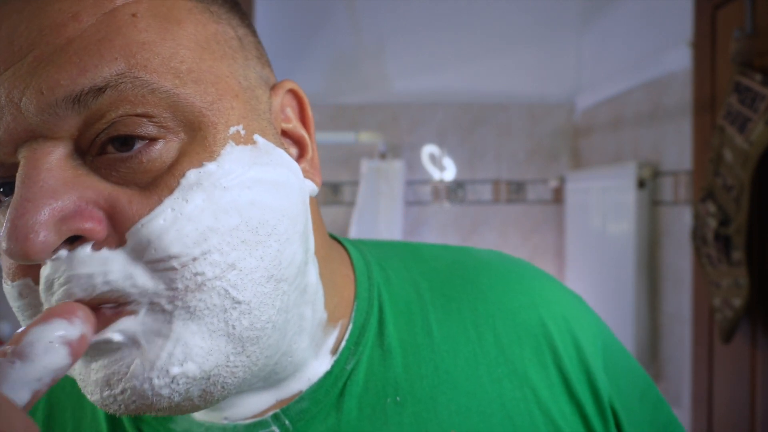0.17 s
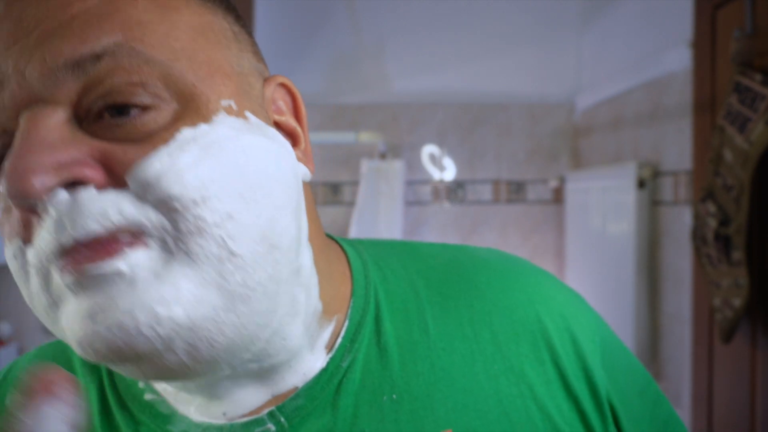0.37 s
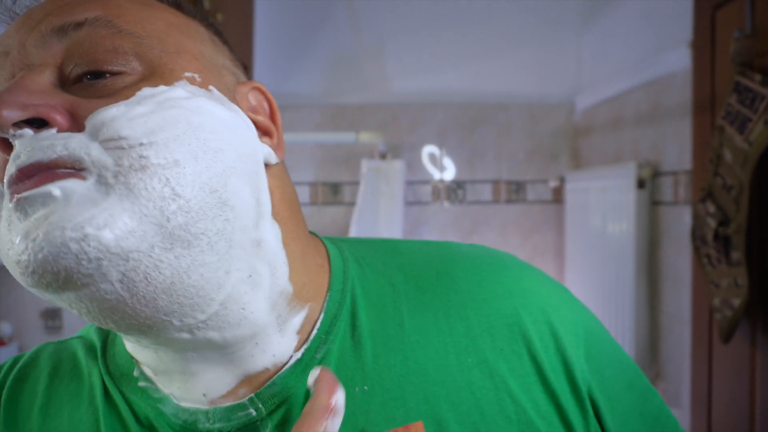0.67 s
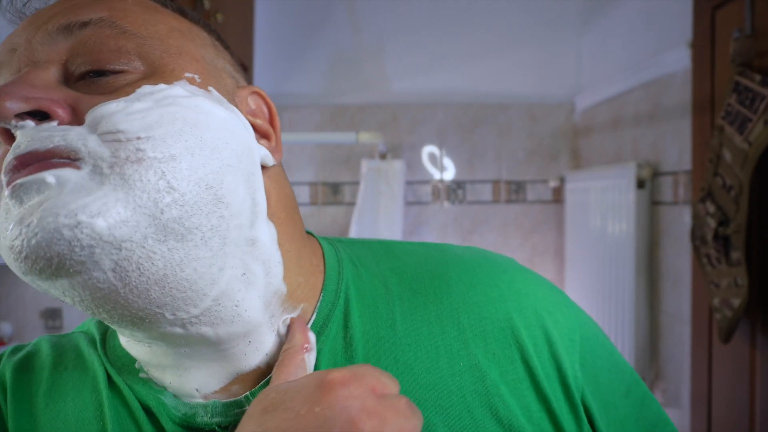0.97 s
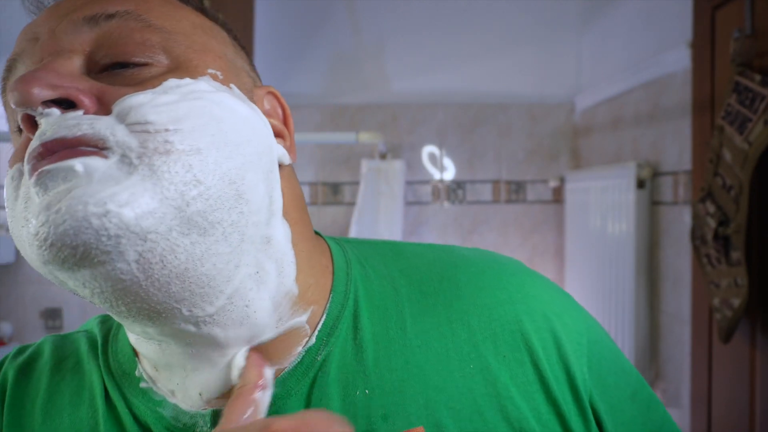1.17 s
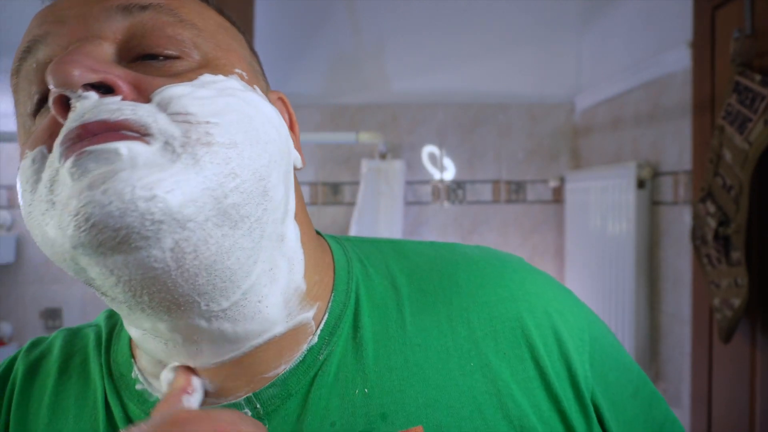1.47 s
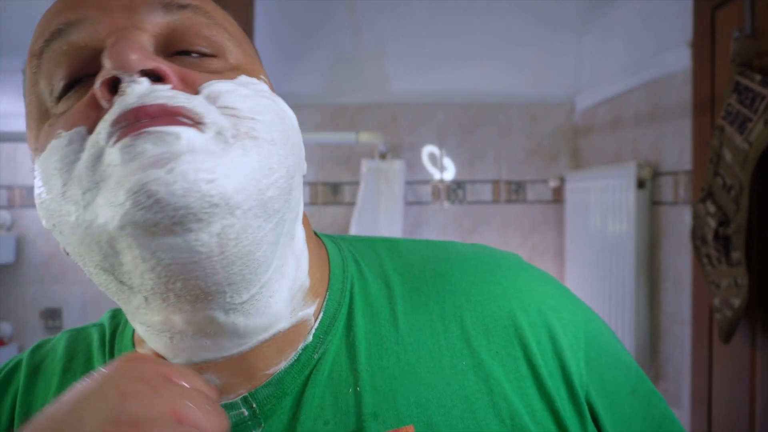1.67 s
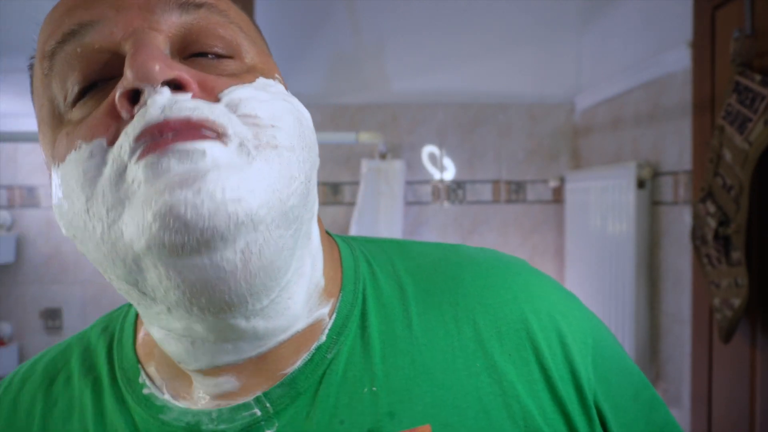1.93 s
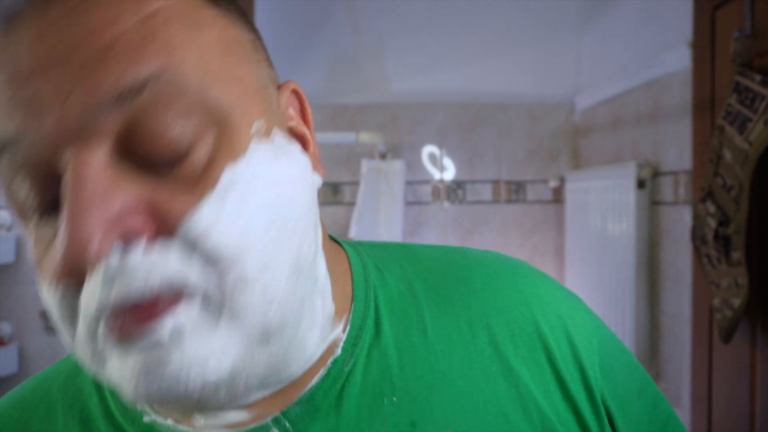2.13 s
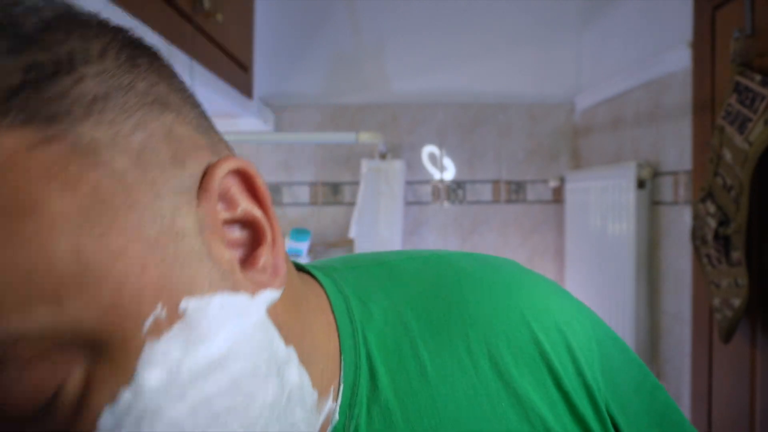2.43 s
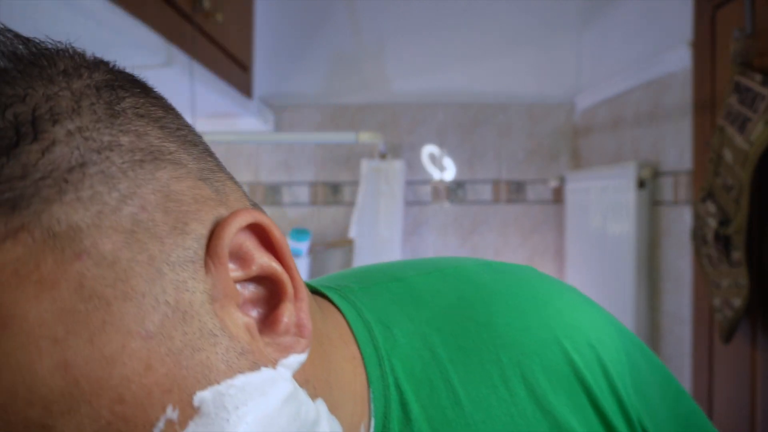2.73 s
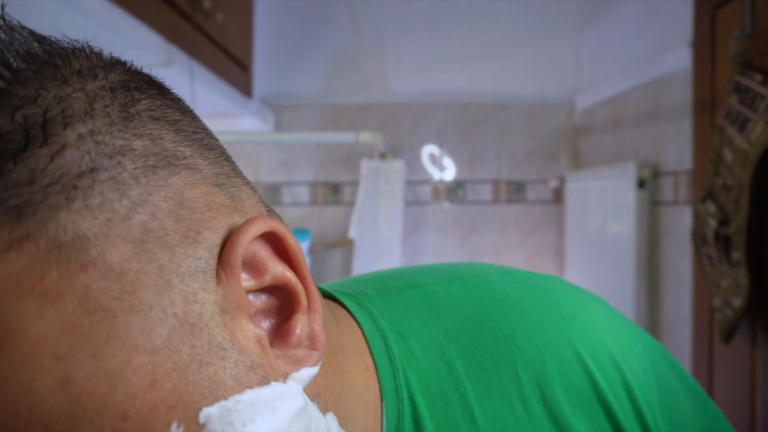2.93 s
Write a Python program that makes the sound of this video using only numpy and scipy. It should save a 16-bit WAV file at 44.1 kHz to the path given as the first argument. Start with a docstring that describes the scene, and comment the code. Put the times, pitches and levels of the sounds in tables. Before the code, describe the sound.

A bright, steady tap stream churns and fizzes in a basin, picked up close in a reverberant bathroom; one soft knock, then drops and sloshes, faint bumps, and finally a slightly thinner hiss.

```python
"""Tap running into a washbasin

A tap runs in a small tiled bathroom: filtered click noise for the hiss, fading sines for fizz and gurgling
bubbles, resonators for churn, bowl and drain. Drops smack the basin, something knocks and bumps softly,
someone shuffles, and near the end a hand enters the stream: the hiss weakens, the bowl's pitch rises.
Dense room reflections surround it all; the stereo is nearly mono in the lows and wide in the treble."""
import sys
import numpy as np
from scipy import signal
from scipy.fft import rfft, irfft
from scipy.io import wavfile
from scipy.ndimage import uniform_filter1d

SR = 44100
rng = np.random.default_rng(int(sys.argv[2]) if len(sys.argv) > 2 else 0)


def master_out(mix):
    """Clip the mix to full scale and print it as 16-bit PCM to the path in sys.argv[1]."""
    frames = np.transpose(np.atleast_2d(mix))
    ceiling = np.clip(frames, -1, 1)
    pcm = np.round(ceiling * 32767).astype(np.int16)
    wavfile.write(sys.argv[1], SR, pcm)


N = 136710

# shuffles of someone moving: (time [s], length [s], level before trim [dB], centre [Hz], width [Hz])
SHUFFLES = [(2.08, .32, -79.5, 255, 100), (2.8, .18, -77, 145, 35), (2.79, .35, -76.5, 300, 60),
            (3.01, .2, -67, 365, 55)]
SHUFFLE_TRIM_DB = 2

# soft bumps: (time [s], peak before onset softening [dB], pitch [Hz])
BUMPS = [(0.125, -61.5, 440), (0.181, -62, 390), (0.401, -62.5, 420), (1.069, -55, 418), (1.246, -60, 400),
         (1.264, -57, 445), (1.414, -57.5, 408), (2.045, -61, 417), (2.654, -56.5, 460), (2.859, -65, 165),
         (3.041, -48, 380), (3.077, -47.5, 378)]
BUMP_T60_S, BUMP_ATTACK_S, BUMP_ROOM_DB = 0.09, 0.002, -1.5

# contacts of the knock: (time [s], peak [dB])
KNOCKS = [(.5145, -40), (.5305, -61)]
# modes of the knocked object: (frequency [Hz], relative level [dB], T60 [s])
KNOCK_MODES = [(500, 5.5, .12), (590, -12, .08), (690, -8, .05), (780, -3, .1), (970, -14, .06),
               (1110, -6, .09), (1225, -9, .06), (1490, -21, .06)]
KNOCK_ROOM_DB = -1.5
RATTLE_DB, RATTLE_HZ, RATTLE_WIDTH_HZ = -17.5, 830, 480  # level re knock peak
RATTLE_T60_S, RATTLES_PER_S = 0.3, 700

BURBLES_PER_S, BURBLE_HZ, BURBLE_OCTAVES, BURBLE_DB = 80, 1200, 0.6, -82
BURBLE_CYCLES, BURBLE_GLIDE = 45, 0.08  # cycles per T60, share of pitch gained over T60

# bowl ringing: (time [s], level [dB])
BOWL_LEVEL = [(0.35, -84), (0.7, -76), (1.0, -81), (1.1, -73), (1.33, -74), (1.48, -86), (2.58, -86),
              (2.67, -66), (2.9, -75)]
BOWL_HZ, BOWL_WIDTH_HZ, BOWL_FLUTTER_DB = 1014, 64, 2
HAND_IN_S, BOWL_HAND_RISE = 2.8, 0.021  # rise as share of pitch

# hollow resonances of basin and drain: (centre [Hz], width [Hz], relative level [dB])
DRAIN = [(275.8, 21, -7), (383, 10.7, -0.5), (441, 43, -6.5), (476, 59, 7.5)]
GURGLE_DB, GURGLE_SWELL_DB = -76, 1.2

FIZZ_PER_S, FIZZ_HZ, FIZZ_OCTAVES = 700, 5620, 0.339  # octaves: rms pitch scatter
FIZZ_CYCLES, FIZZ_DB = 40, -55.5  # cycles per T60

# drops smacking the basin: (time [s], ping peak [dB], pitch [Hz])
DROPS = [(0.3113, -27.5, 6150), (0.326, -37, 5700), (0.347, -38, 5890), (1.195, -35.5, 6000),
         (1.3804, -29.5, 5700), (1.4182, -33.5, 5740), (1.4235, -37, 6030), (1.563, -32.5, 4250),
         (1.576, -33, 3950), (2.245, -34, 6140), (2.375, -35, 4640), (2.669, -34.5, 4500),
         (2.6995, -33.5, 8040)]
DROP_T60_S, DROP_ROOM_DB = 0.007, -0.5
SMACK_DB, SMACK_DECAY_S = -9, 0.0015  # level re ping, 1/e time

# sloshes in basin and over hand: (time [s], length [s], level before trim [dB], centre [Hz], width [Hz])
SLOSHES = [(0.405, .11, -62, 1520, 330), (0.532, .035, -49, 2350, 260), (0.56, .3, -70, 1150, 400),
           (0.58, .4, -56, 2350, 200), (2.617, .085, -48, 2020, 200), (2.645, .05, -62, 1200, 800),
           (2.59, .15, -49, 3900, 1500), (2.68, .55, -57.5, 3030, 450), (2.8, .8, -68, 1520, 220),
           (2.825, .04, -46.5, 2100, 200), (2.832, .04, -48, 4900, 1200), (2.9, .3, -75, 860, 300)]
SLOSH_TRIM_DB = -1.5

# resonances of the churning water: (centre [Hz], width [Hz], relative level [dB])
CHURN_RINGS = [(1936, 60, 2), (2044, 55, 6), (2130, 25, 3), (2341, 65, 3.5), (2680, 80, 0), (3096, 103, 2)]
# churning: (time [s], level [dB])
CHURN_LEVEL = [(0, -59), (0.35, -54.5), (0.7, -54.5), (1.3, -54.5), (1.9, -51), (2.3, -57.5), (2.39, -62),
               (2.48, -54), (2.95, -53), (3.04, -56.5)]
CHURN_FLUTTER_DB, CHURN_LOWEST_HZ = 1.4, 1800

# spray colour: (frequency [Hz], relative level [dB per Hz])
SPRAY_COLOUR = [(25, -50), (62, -36), (115, -34), (150, -27.5), (225, -28), (400, -25), (620, -41),
                (760, -19), (900, -27), (1300, -22.5), (1560, -17), (1770, -15), (1920, -2.5), (2500, -5),
                (2850, -5), (3500, -5.5), (4100, -3.5), (4750, 0), (5250, -4.5), (5900, 2), (7300, -2),
                (8100, 0), (9300, -3), (12000, -3.5), (15500, -5.5)]
# spray: (time [s], level [dB])
FLOW = [(0, -42.5), (0.7, -43), (1.3, -43), (2.05, -43.5), (2.45, -43), (2.63, -43), (2.79, -48),
        (2.86, -46), (2.97, -47.5), (3.1, -45.5)]
IMPACTS_PER_S, IMPACT_SPREAD_DB = 12000, 5.5
SPRAY_FLICKER_DB, SPRAY_FLICKER_HZ, SPRAY_ROOM_DB = 1.5, 71.24, -2
# faint narrow rings in the hiss: (centre [Hz], width [Hz], relative level [dB])
JET_RINGS = [(3967, 15, 2), (4450, 24, -1), (4766, 39, 5.5), (5160, 13, 9), (5740, 70, -5), (6470, 360, -7),
             (8420, 17, 3.5)]
JET_RINGS_DB = -18.5  # re hiss
BASIN_ECHO_DB, BASIN_ECHO_DECAY_S, BASIN_FIRST_S = -7, 0.016, 0.0011

# stereo width, nearly mono in the lows and wide in the treble: (frequency [Hz], side gain [dB])
WIDTH = [(420, -23.5), (1400, -31), (2200, -49.5), (3100, -14.5), (4200, -8), (6200, -8.5), (11000, -0.9),
         (15000, 0)]
ROOM_T60_S, ROOM_TREBLE_T60_S, ROOM_SPLIT_HZ, ROOM_FIRST_S = 0.38, 0.37, 5000, 0.004
TOP_HZ = 15800


def undb(db):
    """Amplitude gain from dB."""
    return 10 ** (np.asarray(db) / 20)


def unit(x):
    """Scale to rms 1."""
    return x / np.sqrt(np.mean(x ** 2) + 1e-20)


def curve(rows):
    """Gain over time from (time [s], level [dB]) rows."""
    return undb(np.interp(np.arange(N) / SR, *np.array(rows).T))


def walk(rate_hz):
    """Smoothed random steps with a spread near 1."""
    k = max(int(SR / rate_hz), 2)
    steps = np.repeat(rng.standard_normal(N // k + 1), k)
    return 1.3 * uniform_filter1d(uniform_filter1d(steps, k), k)[:N]


def colour(x, rows):
    """Filter by (frequency [Hz], gain [dB]) points, interpolated over log frequency."""
    hz, db = np.array(rows).T
    f = np.maximum(np.fft.rfftfreq(2 * N, 1 / SR), 1)
    gain = undb(np.interp(np.log(f), np.log(hz), db))
    return irfft(rfft(x, 2 * N) * gain)[..., :N]


def highpass(x, hz, order):
    """Butterworth high-pass."""
    return signal.sosfilt(signal.butter(order, hz, "high", fs=SR, output="sos"), x)


def resonate(x, hz, width_hz):
    """Resonance with steep skirts: two equal peaks in series."""
    # each peak is wider, so that the pair has the stated width
    b, a = signal.iirpeak(hz, hz / (1.55 * width_hz), fs=SR)
    return signal.lfilter(b, a, signal.lfilter(b, a, x))


def resonances(x, rows):
    """Sum of resonances from (centre [Hz], width [Hz], level [dB]) rows."""
    return sum(undb(db) * unit(resonate(x, hz, width_hz)) for hz, width_hz, db in rows)


def ring(hz, t60_s, glide=0):
    """Fading sine whose pitch may rise by a share as it dies."""
    t = np.arange(int(t60_s * SR) + 2) / SR
    phase = 2 * np.pi * hz * t * (1 + glide * t / t60_s / 2)
    return np.sin(phase) * np.exp(-np.log(1000) * t / t60_s)


def add(out, start_s, sound):
    """Mix a sound in at a time."""
    i = min(max(int(start_s * SR), 0), N - 1)
    out[i:i + len(sound)] += sound[:N - i]


def impacts(rate_per_s, spread_db):
    """Random clicks of either sign and scattered size."""
    hit = rng.random(N) < rate_per_s / SR
    sign = rng.choice([-1, 1], N)
    return hit * sign * undb(spread_db * np.clip(rng.standard_normal(N), -2, 2))


def room(x, wet_db):
    """Mid and side: direct sound plus dense reflections, whose treble dies first."""
    t = np.arange(int(0.6 * SR)) / SR
    noise = rng.standard_normal((2, len(t)))
    bass_share = 1 / (1 + (np.fft.rfftfreq(len(t), 1 / SR) / ROOM_SPLIT_HZ) ** 4)
    tails = 0
    for share, t60_s in (bass_share, ROOM_T60_S), (1 - bass_share, ROOM_TREBLE_T60_S):
        fade = np.exp(-np.log(1000) * t / t60_s) * (t > ROOM_FIRST_S)
        tails = tails + irfft(rfft(noise) * share, len(t)) * fade / np.linalg.norm(fade)
    mid, side = (signal.fftconvolve(x, tail)[:N] for tail in tails)
    wet = undb(wet_db)
    return np.array([x + wet * mid, side * np.hypot(1, wet)])


def patches(rows, wet_db):
    """Brief patches of dense resonant grains that swell quickly and ebb."""
    out, t = np.zeros(N), np.arange(N) / SR
    for start_s, length_s, db, hz, width_hz in rows:
        swell = np.interp((t - start_s) / length_s, [0, 0.2, 1], [0, 1, 0])
        grains = unit(resonate(impacts(1500, spread_db=3), hz, width_hz))
        out += undb(db) * swell * grains
    return room(out, wet_db)


def shuffles():
    """Low grainy patches of someone moving at the basin."""
    return undb(SHUFFLE_TRIM_DB) * patches(SHUFFLES, wet_db=4.5)


def bumps():
    """Dull bumps: one fading sine each, with a soft onset."""
    out = np.zeros(N)
    for start_s, db, hz in BUMPS:
        thud = ring(hz, BUMP_T60_S)
        onset = 1 - np.exp(-np.arange(len(thud)) / SR / BUMP_ATTACK_S)
        add(out, start_s, undb(db) * thud * onset)
    return room(out, BUMP_ROOM_DB)


def knock():
    """Light hollow knock: modes struck twice as it bounces once, under a fading grainy rattle."""
    first_s, first_db = KNOCKS[0]
    blows, age_s = np.zeros(N), np.arange(N) / SR - first_s
    for start_s, blow_db in KNOCKS:
        for k, (hz, db, t60_s) in enumerate(KNOCK_MODES):
            sign = (-1) ** (k // 2)
            add(blows, start_s, sign * undb(blow_db + db) * ring(hz, t60_s))
    rattle = unit(resonate(impacts(RATTLES_PER_S, spread_db=-7), RATTLE_HZ, RATTLE_WIDTH_HZ))
    rattle *= (age_s > 0) * np.exp(-np.log(1000) * np.abs(age_s) / RATTLE_T60_S)
    out = blows / np.max(np.abs(blows)) + undb(RATTLE_DB) * rattle
    return room(highpass(out, 370, order=4) * undb(first_db), KNOCK_ROOM_DB)


def burbles():
    """Larger bubbles blip at random, each rising slightly in pitch."""
    out = np.zeros(N)
    for when, pitch, size in rng.random((int(BURBLES_PER_S * N / SR), 3)):
        hz = BURBLE_HZ * 2 ** (BURBLE_OCTAVES * (2 * pitch - 1))
        gain = undb(10 * size) * hz / BURBLE_HZ
        add(out, when * N / SR, gain * ring(hz, BURBLE_CYCLES / hz, BURBLE_GLIDE))
    return room(unit(out), wet_db=-5.5) * undb(BURBLE_DB)


def bowl():
    """The stream keeps one bowl resonance ringing; its pitch rises a little when the hand comes in."""
    hits = impacts(1500, spread_db=2.5) * undb(BOWL_FLUTTER_DB * walk(22))
    free = unit(resonate(hits, BOWL_HZ, BOWL_WIDTH_HZ))
    covered = unit(resonate(hits, BOWL_HZ * (1 + BOWL_HAND_RISE), BOWL_WIDTH_HZ))
    hand = uniform_filter1d(1. * (np.arange(N) / SR > HAND_IN_S), SR // 20)
    return room((free * (1 - hand) + covered * hand) * curve(BOWL_LEVEL), wet_db=-21.5)


def gurgle():
    """Falling water stirs the hollow of basin and drain: swelling clicks through low resonances."""
    hits = impacts(500, spread_db=3) * undb(GURGLE_SWELL_DB * walk(8.4))
    return room(unit(resonances(hits, DRAIN)), wet_db=-2.0) * undb(GURGLE_DB)


def fizz():
    """Small bubbles ping briefly, each at its own pitch; the level follows the flow."""
    out = np.zeros(N)
    for when, a, b, size in rng.random((int(FIZZ_PER_S * N / SR), 4)):
        scatter = np.sqrt(6) * (a - b)  # triangular, rms 1
        hz = min(FIZZ_HZ * 2 ** (FIZZ_OCTAVES * scatter), 15000)
        add(out, when * N / SR, undb(13.6 * size) * ring(hz, FIZZ_CYCLES / hz))
    out = highpass(out, 2400, order=4)
    return room(unit(out) * unit(curve(FLOW)), wet_db=4.0) * undb(FIZZ_DB)


def drops():
    """Larger drops land with a short noise smack and a bright ping."""
    out, t = np.zeros(N), np.arange(SR // 50) / SR
    for start_s, db, hz in DROPS:
        add(out, start_s, undb(db) * ring(hz, DROP_T60_S))
        noise = unit(resonate(rng.standard_normal(len(t)), hz, 3000))
        add(out, start_s, undb(db + SMACK_DB) * noise * np.exp(-t / SMACK_DECAY_S))
    return room(highpass(out, 3000, order=2), DROP_ROOM_DB)


def sloshes():
    """Grainy patches of water sloshing in the basin and over the hand."""
    return undb(SLOSH_TRIM_DB) * patches(SLOSHES, wet_db=-0.5)


def churn():
    """Irregular bursts ring a cluster of resonances where the jet lands."""
    hits = impacts(1200, spread_db=1.5) * undb(CHURN_FLUTTER_DB * walk(39.9))
    rings = highpass(resonances(hits, CHURN_RINGS), CHURN_LOWEST_HZ, order=8)
    heard = room(rings, wet_db=-12.5)
    return heard / np.std(heard[0]) * curve(CHURN_LEVEL)


def basin(x):
    """Quick reflections inside the bowl ripple the spectrum finely."""
    t = np.arange(SR // 20) / SR
    echo = rng.standard_normal(len(t)) * np.exp(-t / BASIN_ECHO_DECAY_S) * (t > BASIN_FIRST_S)
    return x + undb(BASIN_ECHO_DB) * signal.fftconvolve(x, echo / np.linalg.norm(echo))[:N]


def spray():
    """Jet as countless flickering impacts; steady noise stands for the blur of the tiles."""
    hits = unit(impacts(IMPACTS_PER_S, IMPACT_SPREAD_DB))
    hits = hits * undb(SPRAY_FLICKER_DB * walk(SPRAY_FLICKER_HZ))
    blur_mid, blur_side = rng.standard_normal((2, N))
    wet = undb(SPRAY_ROOM_DB)
    mid = basin(hits + wet * blur_mid)
    side = basin(blur_side * np.hypot(1, wet))
    hiss = unit(colour(np.array([mid, side]), SPRAY_COLOUR))
    rings = unit(resonances(rng.standard_normal((2, N)), JET_RINGS))
    return (hiss + undb(JET_RINGS_DB) * rings) * curve(FLOW)


def scene():
    """Sum all sources, set the stereo width, decode mid and side to left and right."""
    water = spray() + churn() + gurgle() + drops() + sloshes() + fizz() + bowl() + burbles()
    mid, side = water + knock() + bumps() + shuffles()
    side = colour(side, WIDTH)
    return np.array([mid + side, mid - side])


def record(dry):
    """The recorder cuts the top: steep elliptic low-pass."""
    return signal.sosfilt(signal.ellip(10, 0.2, 70, TOP_HZ, fs=SR, output="sos"), dry)


dry = scene()
out = record(dry)
master_out(out)
```